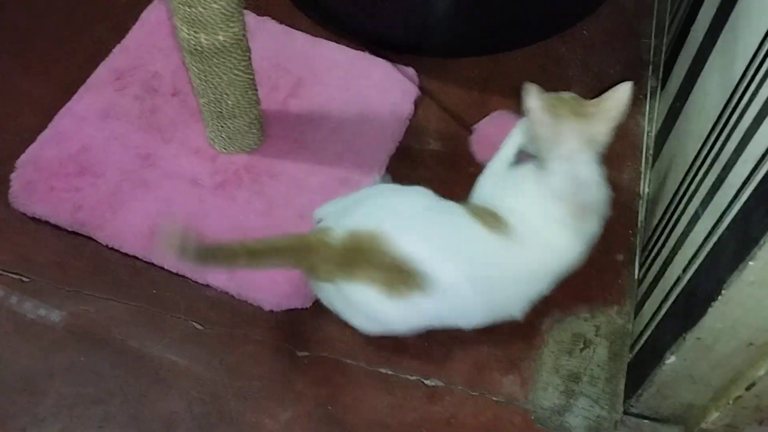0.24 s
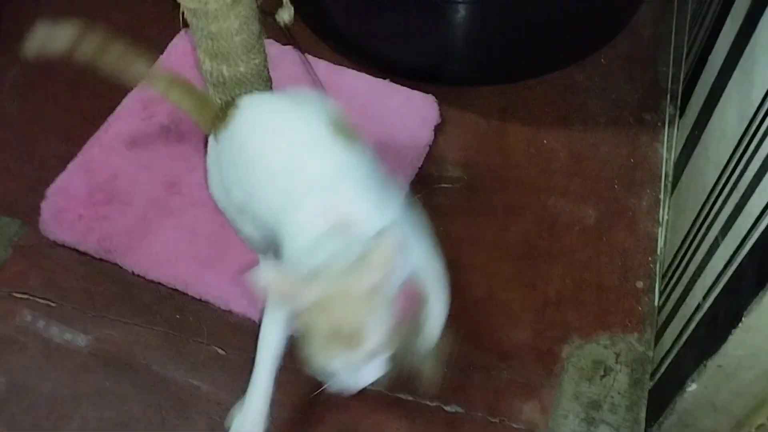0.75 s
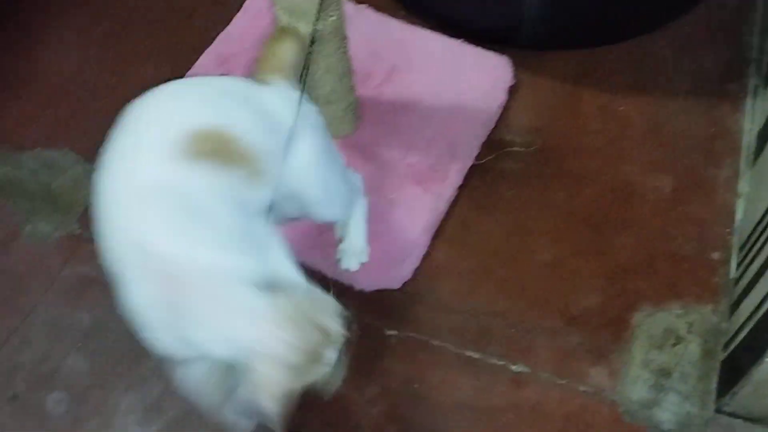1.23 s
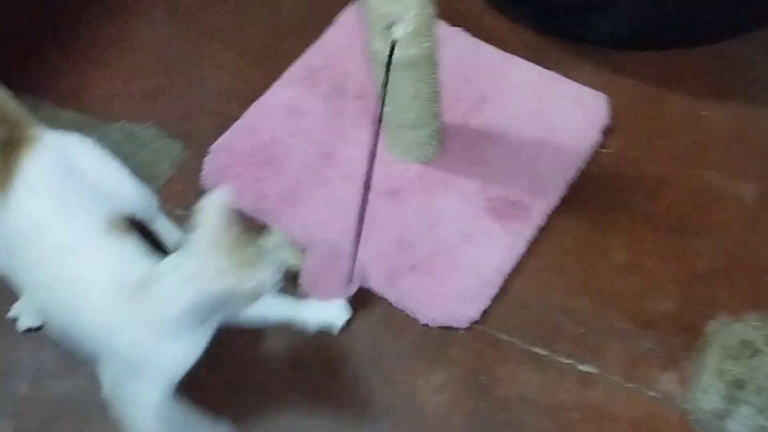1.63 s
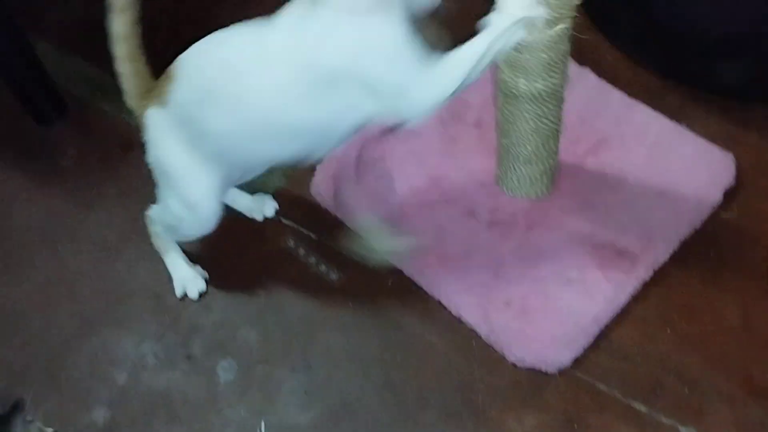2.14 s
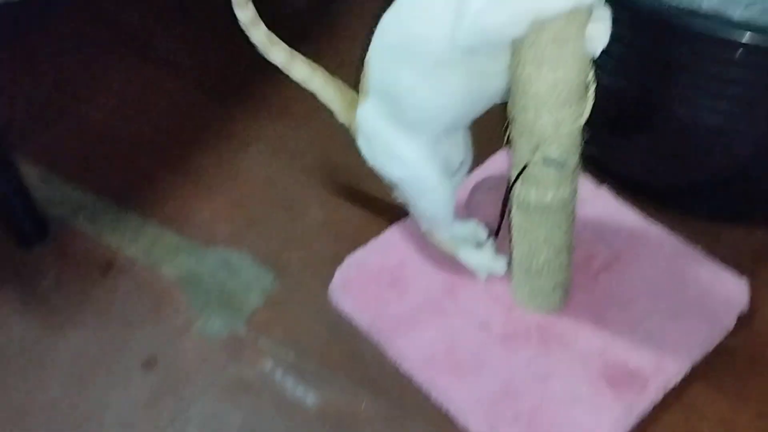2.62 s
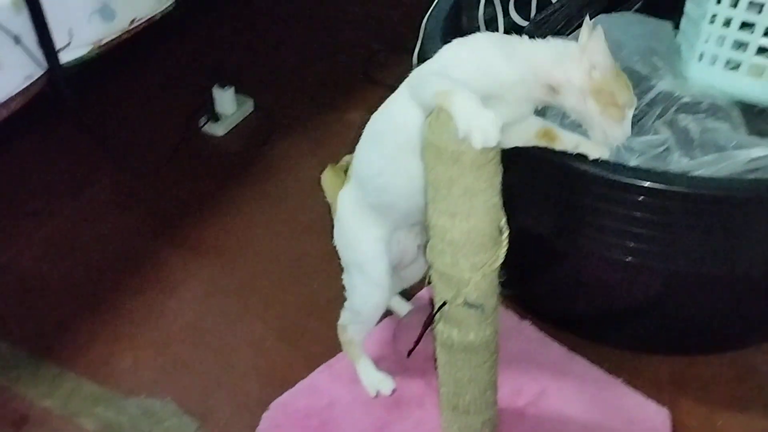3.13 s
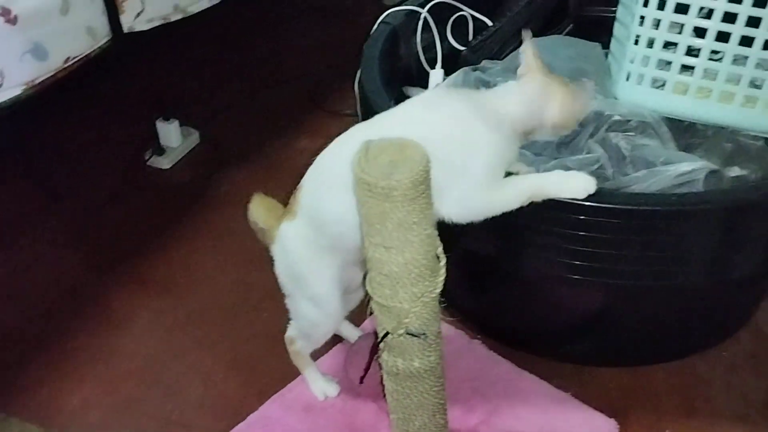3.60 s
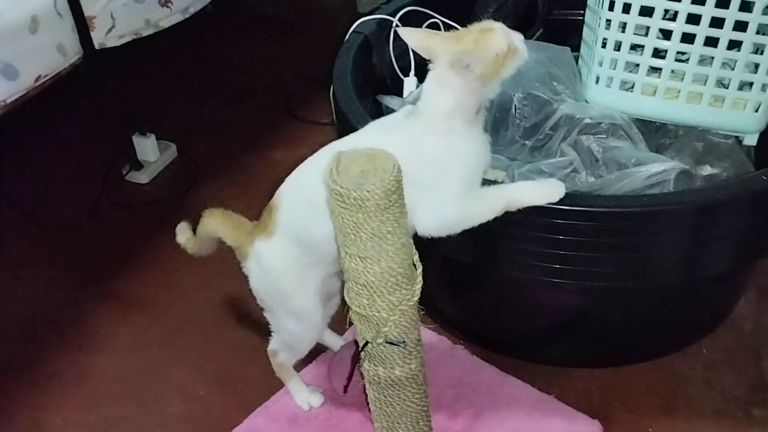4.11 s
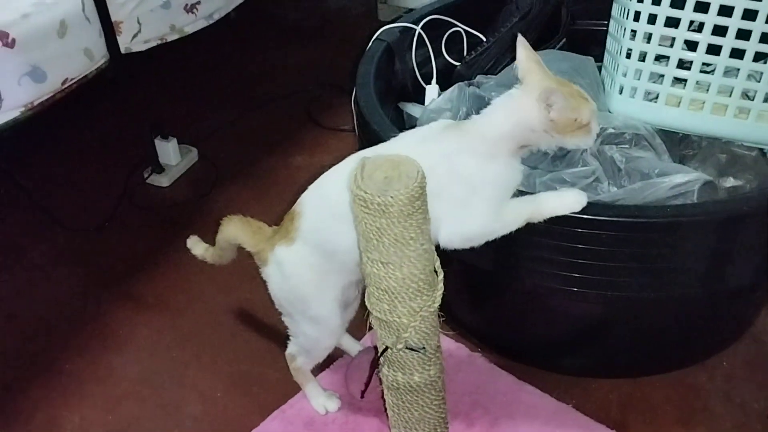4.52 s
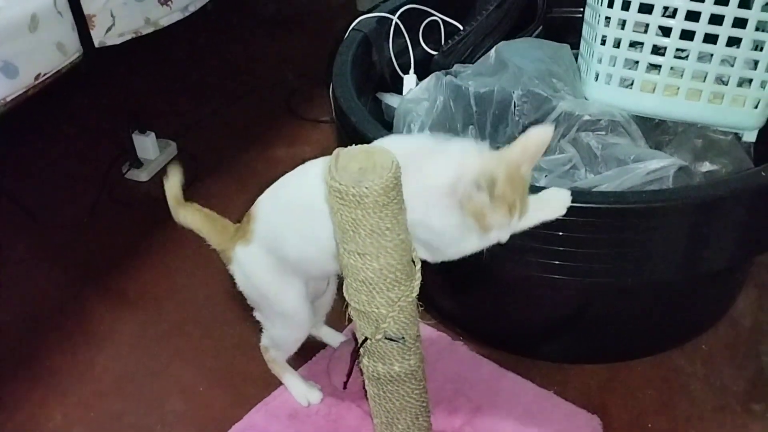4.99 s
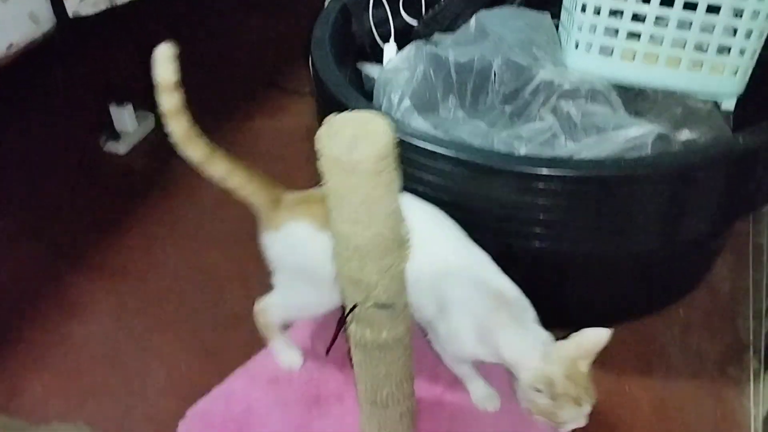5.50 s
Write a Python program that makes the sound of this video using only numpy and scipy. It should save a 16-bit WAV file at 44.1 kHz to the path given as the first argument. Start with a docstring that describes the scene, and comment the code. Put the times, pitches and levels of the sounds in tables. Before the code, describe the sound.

A cat scrabbles at a scratching post, its wooden base scraping and knocking on the floor over a low fan hum.

```python
"""A cat plays round a rope-wound scratching post, whose wooden base board drags, tips and slaps the floor. Each
blow makes the board ring and echo in the small, hard-floored room. Paws thud, sharp ticks click, and fur
rustles on rope and plush. Behind it all, two three-bladed fans hum over their rush of air; they turn at nearly
the same speed, so the hum slowly throbs. Two spaced microphones listen."""
import sys
import numpy as np
from scipy import signal
from scipy.fft import rfft, irfft, next_fast_len
from scipy.io import wavfile
from scipy.ndimage import map_coordinates

SR = 44100
rng = np.random.default_rng(int(sys.argv[2]) if len(sys.argv) > 2 else 0)


def transcribe(signal):
    """Save signal, clipped to [-1, 1], as a 16-bit WAV file at the path in sys.argv[1]."""
    frames = np.atleast_2d(signal).T
    limited = np.clip(frames, -1, 1)
    pcm = np.round(limited * 32767).astype(np.int16)
    wavfile.write(sys.argv[1], SR, pcm)


N = 253575


def amp(db):
    """Turn decibels into a gain."""
    return 10 ** (np.asarray(db) / 20)


def along(points, hz):
    """Read a list of (frequency, value) points at hz, on a log scale."""
    f, v = np.transpose(points)
    return np.interp(np.log(hz + 1), np.log(f + 1), v)


def curves(rows):
    """Join timed rows with straight lines: one curve per column, -120 outside the rows."""
    times, *columns = np.transpose(rows)
    return [np.interp(np.arange(N) / SR, times, c, left=-120, right=-120) for c in columns]


def wobble(rate):
    """A smooth random curve through `rate` points a second."""
    points = rng.standard_normal(int(N * rate / SR) + 4)
    return map_coordinates(points, [np.arange(N) * rate / SR])


def grit(spiky_db, rate):
    """Two noises whose strength jumps about, as rubbing catches and slips."""
    return rng.standard_normal((2, N)) * amp(spiky_db * wobble(rate))


def filtered(x, response):
    """Scale each frequency in x by response(hz)."""
    n = x.shape[-1]
    size = next_fast_len(n + SR // 2)
    return irfft(rfft(x, size) * response(np.fft.rfftfreq(size, 1 / SR)), size)[..., :n]


# How alike left and right are for sound from all sides (1 same, -1 opposite): f/Hz, likeness
ALL_ROUND_LIKENESS = [(60, 0.89), (130, 0.91), (290, 0.88), (640, 0.33), (1000, -0.43), (1410, -0.37),
                      (2300, 0.2), (3500, -0.021), (6800, -0.00087)]
def diffuse(pair, spectrum, likeness=ALL_ROUND_LIKENESS):
    """Colour two unrelated signals and blend them into left and right, at an rms level of 1."""
    def blend(hz):
        angle = np.arccos(np.clip(along(likeness, hz), -1, 1)) / 2
        return amp(along(spectrum, hz)) * [np.cos(angle), np.sin(angle)]
    mid, side = filtered(pair, blend)
    stereo = np.array([mid + side, mid - side])
    return stereo / np.sqrt(np.mean(stereo ** 2) + 1e-20)


# How often a blade passes: t/s, first fan f/Hz, second fan f/Hz
BLADE_RATES = [(0, 65.1, 68.08), (3.3, 65.1, 68.08), (4.2, 65.1, 68.33), (5.75, 65.1, 68.38)]
# Tones in the hum: multiple of the blade rate, first fan level/dB, second fan level/dB
HUM_TONES = [(1 / 3, -66, -52), (1, -50.5, -51.5), (2, -57, -63), (3, -62, -67), (4, -59, -72)]
# Colour of the rushing air: f/Hz, relative level/dB
AIR_COLOUR = [(15, -5), (31, -16), (50, -9), (78, -14.5), (95, -14), (122, -6.5), (165, -13), (250, -9.5),
              (450, -12.5), (570, -16.5), (850, -16.5), (1300, -26.5), (1800, -26), (2250, -24.5),
              (2800, -31.5), (7500, -43), (10000, -59)]
# Colour of a faint high hiss: f/Hz, relative level/dB
HISS_COLOUR = [(3000, 0), (6000, -20), (9000, 2), (16000, -7)]
def fans():
    """Two fans push air; their blade tones drift in and out of step, so the hum throbs."""
    in_step_s, motor_hz = .13, 24.67
    phase = 2 * np.pi * np.cumsum(curves(BLADE_RATES), axis=1) / SR
    phase -= phase[:, [round(in_step_s * SR)]]
    phase += .1 * np.array([wobble(3), wobble(3)])  # swirling air unsettles the blades
    tones = sum(amp(np.array(db)[:, None] + wobble(4)) * np.cos(k * phase) for k, *db in HUM_TONES)
    motor = amp(-57) * np.cos(2 * np.pi * motor_hz * np.arange(N) / SR)
    air = amp(-42 + 0.4 * wobble(2.5)) * diffuse(rng.standard_normal((2, N)), AIR_COLOUR)
    hiss = amp(-67) * diffuse(rng.standard_normal((2, N)), HISS_COLOUR)
    return np.sqrt(2) * (tones.sum(axis=0) + motor) + air + hiss


def crinkle(start_s=3.463):
    """A claw taps something thin and stiff; being crumpled, it holds no clean pitch."""
    t = np.arange(SR // 5) / SR
    wander = .26 * np.cumsum(rng.standard_normal((2, len(t))), axis=1)
    lower = amp(-55 - 60 * t / .2) * np.sin(2 * np.pi * 4000 * t + wander[0])
    upper = amp(-56 - 60 * t / .12) * np.sin(2 * np.pi * 6500 * t + wander[1])
    return np.pad(lower + upper, (round(start_s * SR), N))[:N]


# Sharp ticks: t/s, level/dB before filtering, relative treble level/dB
SHARP_TICKS = [(0.9004, -41, -9), (1.5085, -43, -3), (1.519, -51, 0.5), (1.5434, -44.5, 6.5),
               (1.6982, -14.5, -30), (2.3444, -35.5, -26), (2.3985, -38, -4), (2.408, -39, -5),
               (2.4355, -35, -11), (2.457, -49, -2), (2.798, -37, -33), (2.8466, -35, -44),
               (3.463, -44, -10)]
def sharp_ticks():
    """A sharp tick: a tiny burst of noise whose treble dies first."""
    dull, bright = np.zeros((2, 2, N + SR))
    t = np.arange(SR // 20) / SR
    for start, db, treble_db in SHARP_TICKS:
        snap = amp(db - 60 * t / 0.04) * rng.standard_normal((2, len(t)))
        dull[:, round(start * SR):][:, :len(t)] += snap
        bright[:, round(start * SR):][:, :len(t)] += amp(treble_db - 60 * t / .012) * snap
    lows = filtered(dull, lambda hz: amp(along([(800, -37), (2000, 5.5), (5000, -10), (9000, -23)], hz)))
    highs = filtered(bright, lambda hz: amp(along([(6000, -50), (10000, 1.5)], hz)))
    return (lows + highs)[:, :N]


# Colour of fine fur and plush: f/Hz, relative level/dB
FUR_COLOUR = [(2000, -37), (5000, -6), (9000, -5.5), (13000, -7.5), (16000, -10)]
# Colour of a coarse scrape: f/Hz, relative level/dB
SCRAPE_COLOUR = [(300, -34.5), (700, 4.5), (1000, 0.5), (1400, -0.5), (1900, -12), (2500, -7),
                 (3000, -14.5), (3600, -10), (5000, -20.5), (9000, -34)]
# Strokes on the post: loudest from t/s, held for t/s, fur level/dB, scrape level/dB
CAT_STROKES = [(.826, 0, -75, -63), (1.381, 0.025, -55, -46.5), (1.435, 0.03, -61, -53),
               (1.508, 0.076, -55, -50), (1.63, 0.1, -55.5, -52.5), (1.77, 0.012, -59, -72),
               (2.33, 0.026, -59.5, -55), (2.405, 0.049, -56.5, -40.5), (2.648, 0.011, -51, -41.5),
               (2.79, .01, -64, -48), (3.11, 0, -80, -55), (3.282, 0.0072, -63, -50),
               (3.465, 0.0099, -66, -52)]
def rustle():
    """Fur, claws and pads stroke plush and rope, making many tiny fibres slip."""
    rise_db_per_s, fall_db_per_s = 420, 297
    start, held, fur_db, scrape_db = np.transpose(CAT_STROKES)[..., None]
    t = np.arange(N) / SR - start
    shape_db = rise_db_per_s * np.minimum(t, 0) - fall_db_per_s * np.maximum(t - held, 0)
    fur = diffuse(grit(spiky_db=1, rate=480), FUR_COLOUR)
    scrape = diffuse(grit(spiky_db=-2, rate=190), SCRAPE_COLOUR)
    fur *= amp(np.max(fur_db + shape_db, axis=0))
    scrape *= amp(np.max(scrape_db + shape_db, axis=0))
    return fur + scrape


# Paws landing: t/s, level/dB, f/Hz
PAW_LANDINGS = [(0.204, -12, 140), (2.456, -18.5, 141), (2.651, -19.5, 220), (3.114, -21.5, 90),
                (5.613, -33, 131)]
def paw_thuds():
    """A soft paw lands with a low note that dies within a few cycles."""
    out, t = np.zeros(N + SR), np.arange(SR // 5) / SR
    for start, db, hz in PAW_LANDINGS:
        shape = amp(db - 60 * t / 0.026) * (1 - np.exp(-t / 0.002))
        out[round(start * SR):][:len(t)] += shape * np.sin(2 * np.pi * hz * t)
    return out[:N]


# How alike left and right are for the nearby board: f/Hz, likeness
NEAR_LIKENESS = [(300, .97), (640, .85), (1410, 0.0041), (2300, -0.21)]
# How long the room echoes: f/Hz, t/s to fade by 60 dB
ECHO_TIMES = [(200, 0.092), (1000, 0.22), (4000, 0.18), (12000, 0.077)]
def room_echo(x, echo_db):
    """The walls throw sound back, and each frequency dies at its own speed."""
    hz, t, noise = signal.stft(rng.standard_normal((2, SR // 3)), SR, nperseg=256)
    tail = signal.istft(noise * amp(-60 * t / along(ECHO_TIMES, hz)[:, None]), SR, nperseg=256)[1]
    tail = diffuse(tail, [(250, 1), (600, 2.5), (1300, 0.5), (2300, 2.5), (3600, -2.5)], NEAR_LIKENESS)
    tail = np.pad(tail, ((0, 0), (80, 0)))  # the echo starts 2 ms after the blow
    return amp(echo_db) * signal.fftconvolve(x[None], tail / np.linalg.norm(tail[0]), axes=1)


# The board's own notes: f/Hz, relative level/dB, t/s to fade by 60 dB
BOARD_NOTES = [(264, 0, .11), (415, -3, .06), (447, 1, .09), (556, -4, .08), (598, -9, .08),
               (705, -10, .07), (820, -12, .05), (925, -9, .06), (1240, -13, .08), (1324, -13, .1),
               (1420, -18, .06), (1570, -20, .05), (1720, -18, .05), (1855, -15, .06), (2020, -17, .05),
               (2200, -17, .06), (2450, -20, .05), (2750, -24, .05), (3590, -10, .025)]
def board_ring(low_db, mid_db, top_db, tap_db):
    """The struck board rings with many notes; where it lands decides which are strong."""
    hz, db, fade_s = np.transpose(BOARD_NOTES)[..., None]
    t = np.arange(SR // 6) / SR
    boosts = [(300, low_db), (400, 0), (480, 0), (560, tap_db), (700, 0),
              (1300, mid_db), (2300, (4 * mid_db + top_db) / 5), (3400, top_db)]
    level = db + along(boosts, hz) + 1.5 * rng.standard_normal(hz.shape)  # no two blows alike
    fade = amp(level - 60 * t / fade_s)
    # The board lies loose on the floor, so its notes waver.
    chatter = np.cumsum(rng.standard_normal((len(hz), len(t))), axis=1) * hz * 2e-5
    # High notes reach the two microphones out of step.
    apart = np.clip(hz / 1400 - .25, 0, 1) * rng.standard_normal(hz.shape)
    ring = [np.sum(fade * np.sin(2 * np.pi * hz * t + chatter + side * apart), axis=0)
            for side in (1, -1)]
    bass_cut = signal.butter(6, 232, "high", fs=SR, output="sos")  # the ring holds no deep bass
    return signal.sosfilt(bass_cut, ring)


# The board sliding: t/s, level/dB, relative bass level/dB, relative treble level/dB
BOARD_SLIDE = [(0, -39, -12, -3.5), (.015, -30, -31, -10.5), (.055, -27, -28, -5), (.08, -34, -25, 1),
               (.095, -31.5, -22, -3.5), (.14, -31, -0.5, -5), (.19, -33, -7, -7.5), (.27, -42.5, -2, -3.5),
               (.3, -39, -2.5, -4.5), (.42, -65, 10, -6)]
def board_drag():
    """The board sticks and slips on the floor, and each jolt rings it; the plush hisses along."""
    db, low_db, high_db = curves(BOARD_SLIDE)
    jolts = grit(spiky_db=1, rate=160)
    ring = board_ring(low_db=0, mid_db=3, top_db=-12, tap_db=2)[0]
    ring *= amp(-60 * np.arange(len(ring)) / SR / .09)  # touching the floor shortens the ring
    body = signal.fftconvolve(jolts, ring[None], axes=1)[:, :N]
    low = diffuse(body, [(320, 0), (360, -40)], NEAR_LIKENESS)
    middle = diffuse(body, [(320, -40), (360, 0), (900, 0), (1050, -40)], NEAR_LIKENESS)
    high = diffuse(body, [(900, -40), (1050, 7), (1400, -0.5), (2300, 2.5)], NEAR_LIKENESS)
    hiss = amp(-47 + 0.74 * (db - db.max())) * diffuse(grit(spiky_db=-1, rate=110), FUR_COLOUR)
    return amp(db) * (amp(low_db) * low + middle + amp(high_db) * high) + hiss


# The board hitting the floor: t/s, relative level/dB, then boost/dB of its low, middle, top, 560 Hz notes
BOARD_BLOWS = [(0.0122, -14.5, 3.5, 1.5, -29, 2.5), (0.048, -18, -5, 0, -5, -9),
               (.068, -21.5, -7, 12.5, -2, -8), (0.091, -15.5, 1, -11, -12, -17),
               (0.166, -22, -18, 11.5, -13, 0), (.189, -20.5, -10, -2, -15, -7),
               (0.8146, -32.5, 10.5, 5.5, -3, 8.5), (1.427, -29.5, -11, 4, -19, 2),
               (1.6981, -1, -2.5, 2, 6.5, -2), (2.291, -30.5, -12, -14, -15, 16),
               (2.4352, -3.5, -9, 6, -17, 1.5), (2.605, -34.5, 8, 2, -5.5, 0),
               (2.652, -34.5, -10, 11, 0, -3), (3.1, -28, -31, -2, -12, -1), (5.055, -31, 4, -9, -20, -3)]
def board_knocks():
    """The board slaps the floor, clatters and rings; after a hard blow it bounces and lands again."""
    hard_db, bounce_s, bounce_loss_db = -10, 0.029, 18
    out, t = np.zeros((2, N + SR)), np.arange(SR // 6) / SR
    plush = signal.butter(6, 4200, fs=SR, output="sos")  # the soft cover dulls the blow
    joints = signal.butter(2, (1200, 3200), "band", fs=SR, output="sos")  # loose joints clatter here
    bounces = [(start + bounce_s, db - bounce_loss_db, *boosts)
               for start, db, *boosts in BOARD_BLOWS if db > hard_db]
    for start, db, low_db, mid_db, top_db, tap_db in list(BOARD_BLOWS) + bounces:
        clatter = signal.sosfilt(joints, rng.standard_normal((2, len(t))))
        clatter *= amp(mid_db - 7 - 60 * t / 0.045)
        slap_db = 9 + 1.5 * db + 0.65 * mid_db + 0.25 * top_db  # harder, brighter blows slap more
        slap_shape = amp(slap_db - 60 * t / 0.0027) * (1 - np.exp(-t / 0.00015))
        slap = slap_shape * np.sin(2 * np.pi * 1900 * t)
        ring = board_ring(low_db, mid_db, top_db, tap_db)
        blow = amp(db - 11) * signal.sosfilt(plush, ring + slap + clatter)
        echo = room_echo(blow[0], echo_db=-7)
        out[:, round(start * SR):][:, :len(t)] += blow
        out[:, round(start * SR):][:, :echo.shape[1]] += echo
    return out[:, :N]


def scene():
    """The board, the cat and the fans together."""
    return board_knocks() + board_drag() + paw_thuds() + rustle() + sharp_ticks() + crinkle() + fans()


# Treble of both microphones, with two dips: f/Hz, level/dB
MIC_COLOUR = [(7000, 0.5), (8200, -5), (9600, -1), (10400, -3), (11200, -8), (12300, 2.5), (14500, 4),
              (15800, 3)]
# How much louder the left microphone is than the right: f/Hz, level/dB
MIC_BALANCE = [(60, 0.0), (110, 0), (200, 1), (380, -2.5), (700, 3), (1290, -3), (2380, -4.5), (4400, 1.5),
               (8120, -2), (15000, 4.5)]
def record(dry):
    """The microphones colour the sound, gently squash the loudest peaks and cut the highest treble."""
    ceiling, top_hz = .95, 15830
    lean_db = lambda hz: along(MIC_BALANCE, hz) * [[.5], [-.5]]
    heard = filtered(dry, lambda hz: amp(along(MIC_COLOUR, hz) + lean_db(hz)))
    squashed = heard / (1 + np.abs(heard / ceiling) ** 6) ** (1 / 6)
    return filtered(squashed, lambda hz: hz < top_hz)


dry = scene()
out = record(dry)
transcribe(out)
```